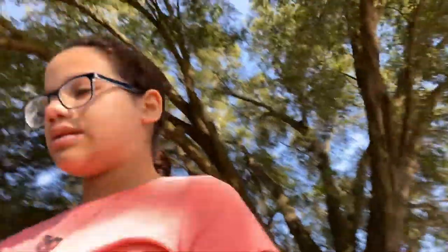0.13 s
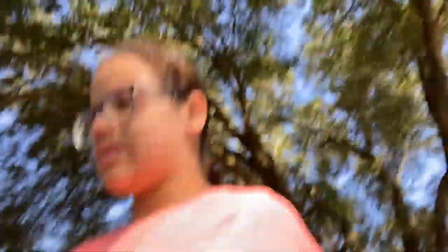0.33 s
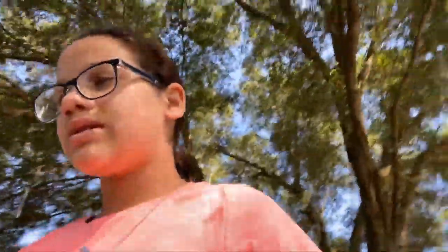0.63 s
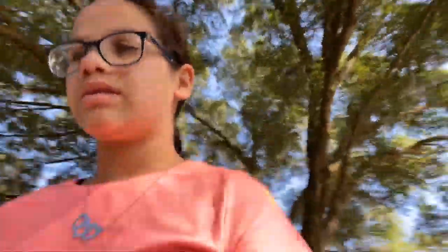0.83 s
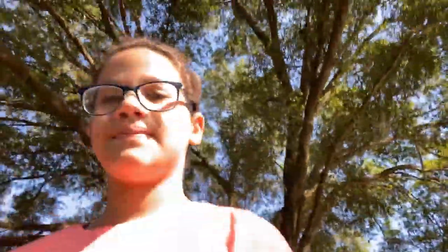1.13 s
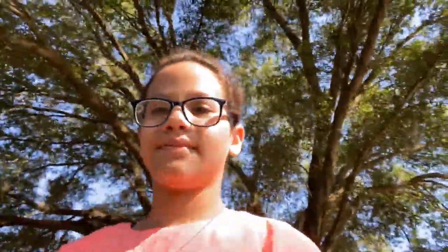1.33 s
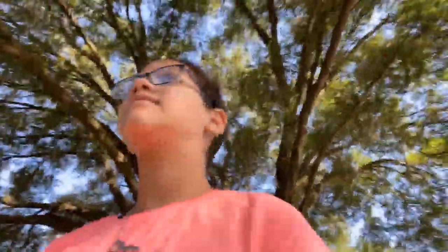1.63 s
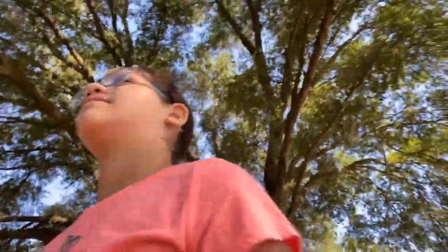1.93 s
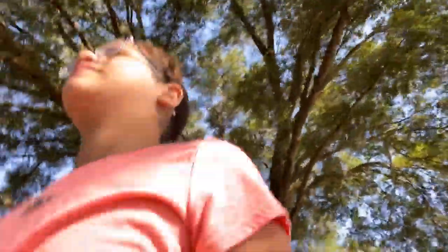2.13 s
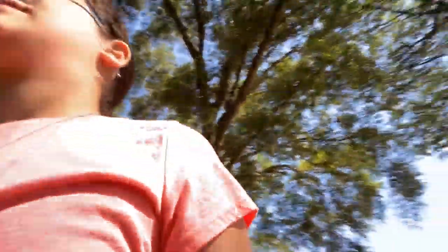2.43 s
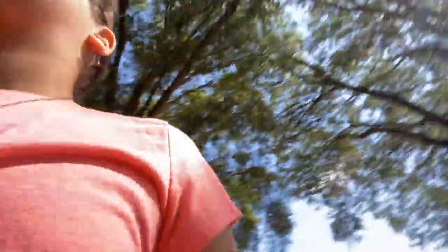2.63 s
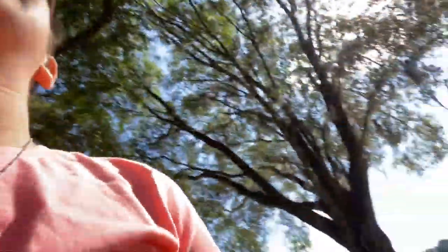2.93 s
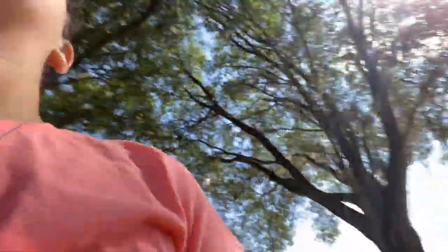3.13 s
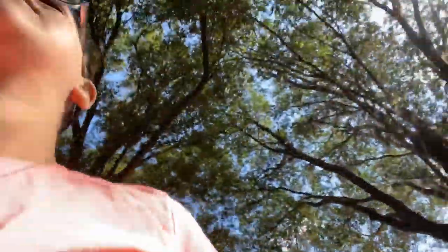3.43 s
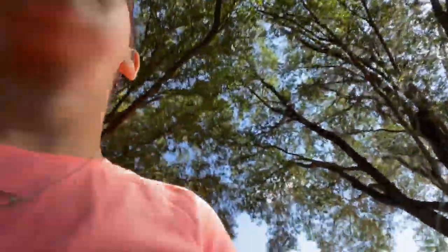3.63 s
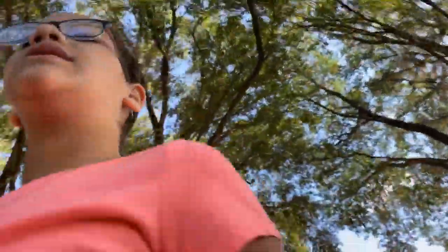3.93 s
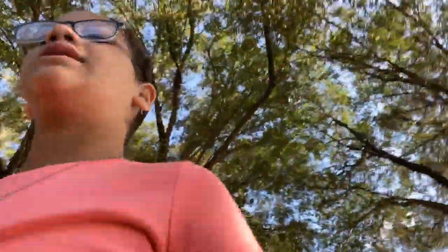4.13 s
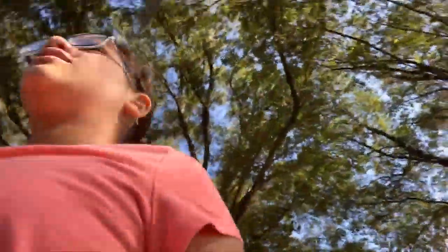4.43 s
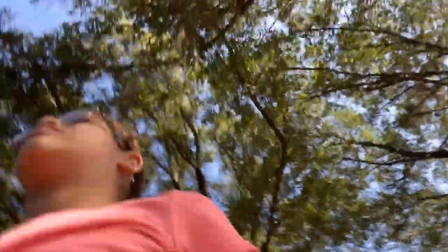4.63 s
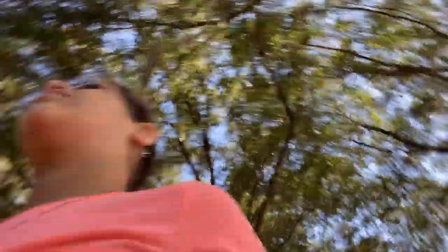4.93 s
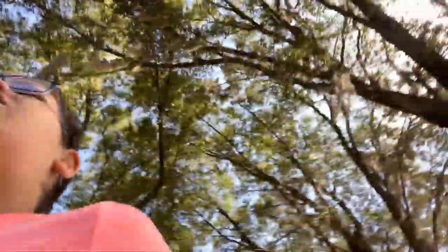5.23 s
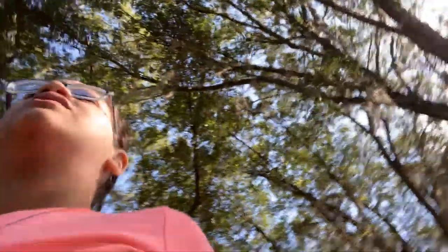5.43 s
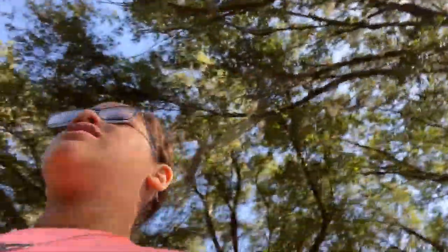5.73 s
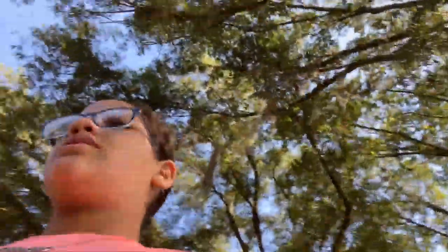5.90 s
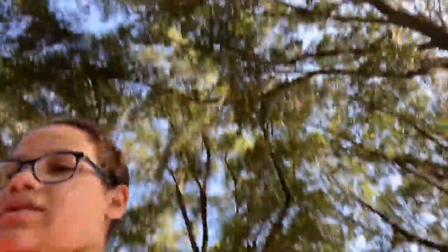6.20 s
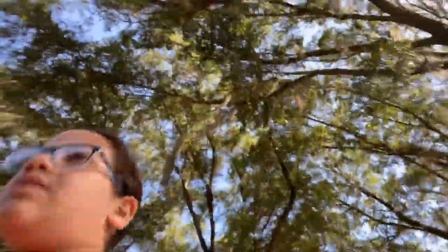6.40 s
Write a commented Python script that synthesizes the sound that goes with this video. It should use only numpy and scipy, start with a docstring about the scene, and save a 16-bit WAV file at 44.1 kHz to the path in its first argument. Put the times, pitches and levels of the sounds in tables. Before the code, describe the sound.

Outdoors under trees, a carried phone's microphone is buffeted by moving air: irregular dull thumps over low rumble and flutter. An early cluster thins to a near-quiet lull around two seconds, leaving leaf hiss and small dry ticks. Thumps return in dense groups before three seconds and continue, with faint scuffs and brief thin chirps. The strongest blast comes shortly after six seconds. Very close, dry sound with no echo.

```python
"""Uneven thumps of moving air buffet a microphone port, over a lumpy rumble and flutter: turbulent noise
whose spectrum stretches with air speed. Someone walks under trees, phone in hand: shoes and cloth scuff
(grainy noise strokes), grit and fingers tick (very short noise bursts), faint chirps and pings sound
(gliding sines). Behind lie leaves (patchy coloured hiss) and far traffic (a swelling noise band)."""
import sys
import numpy as np
from scipy import signal
from scipy.fft import rfft, irfft
from scipy.io import wavfile
from scipy.ndimage import uniform_filter1d, minimum_filter1d

SR = 44100
rng = np.random.default_rng(int(sys.argv[2]) if len(sys.argv) > 2 else 0)


def inscribe(sig):
    """Save sig as 16-bit PCM at rate SR to the path in sys.argv[1].

    A 1-D sig is mono; a 2-D sig holds one channel per row.
    Samples are clipped to [-1, 1] before scaling.
    """
    pcm = np.round(np.clip(np.atleast_2d(sig).T, -1, 1) * 32767)
    wavfile.write(sys.argv[1], SR, pcm.astype(np.int16))


N = 289384  # samples


def amp(db):
    """Amplitude factor of a level in dB."""
    return 10 ** (np.asarray(db) / 20)


def evened(x):
    """Scales x to rms 1."""
    return x / np.sqrt(np.mean(x ** 2) + 1e-20)


def add(mix, start_s, sound):
    """Adds sound to mix from start_s, cropped at both ends of the mix."""
    at = round(start_s * SR)
    part = mix[max(at, 0):][:len(sound) + min(at, 0)]
    part += sound[max(-at, 0):][:len(part)]


def coloured(x, gain):
    """Filters x by gain(Hz)."""
    return irfft(rfft(x) * gain(np.fft.rfftfreq(len(x), 1 / SR)), len(x))


def band(centre_hz, octaves):
    """Bell-shaped gain on the octave axis."""
    return lambda f: np.exp(-2 * (np.log2((f + 1) / centre_hz) / octaves) ** 2)


def wander(corner_hz, count):
    """Slow random drift of rms 1, falling off above corner_hz."""
    return evened(coloured(rng.standard_normal(count), lambda f: 1 / (1 + (f / corner_hz) ** 2)))


PORT_HZ = 57.6  # the microphone port loses the bass below this
EDDY_M = 0.0062
RISE, STEEPNESS = 0.57, 1.262  # spectrum exponents below and above the peak


def eddies(f, speed_m_s):
    """Eddies pass the port about speed / size times a second; smaller ones fade fast."""
    port = 1 / (1 + (PORT_HZ / (f + 1)) ** 4)
    u = f * EDDY_M / np.maximum(speed_m_s, .1)
    return port * u ** RISE * np.exp(-u ** STEEPNESS)


# single buffets of air: (peak time [s], level [dB], nominal air speed [m/s], length scale [ms])
BUFFETS = [(.08, -33, 0.51, 17), (.159, -13.5, 1.47, 4.5), (.176, -22, 0.67, 55), (.217, -23, 0.72, 8.1),
           (.355, -35.5, 2.4, 25), (.374, -23, 1.77, 13), (.412, -22.5, 1.04, 24), (0.434, -25, 2.1, 7.2),
           (.462, -24.5, 1.61, 63), (.562, -24, 0.8, 19), (.61, -24.5, 1.07, 9.3), (.63, -24, 1.53, 8.9),
           (0.674, -27.5, 1, 11), (0.765, -29, 0.63, 4.3), (.85, -35, 1.27, 14), (.886, -25.5, 1.57, 14.6),
           (0.917, -27.5, 1.5, 19), (.922, -23, .81, 46), (1.125, -36, 1.8, 31), (1.179, -36, 1.6, 23),
           (1.249, -38, 0.81, 18), (1.312, -21.5, 2.13, 15.5), (1.335, -21.5, 1.43, 28),
           (1.445, -29, 0.26, 60), (2.223, -30, .6, 30), (2.447, -33.5, 0.41, 41), (2.503, -32.5, 0.93, 16),
           (2.557, -32.5, 1.17, 15.5), (2.758, -35, 0.17, 17), (2.827, -18, 1.58, 6.9),
           (2.843, -14.5, 0.41, 13.3), (2.851, -18.5, 1.66, 7.7), (2.969, -21, 1.45, 17),
           (2.984, -15.5, 1.95, 7.4), (2.993, -15, 2.37, 5.5), (3.005, -19, 2.05, 6), (3.009, -19, .38, 27),
           (3.027, -13.5, 1.99, 6.6), (3.035, -20, 1.4, 14), (3.138, -22.5, 1.3, 12), (3.157, -14, 1.9, 16),
           (3.167, -18.5, 2.94, 2.5), (3.269, -20.5, 1.05, 28), (3.323, -18.5, 1.9, 13.4),
           (3.325, -14, 0.72, 15.5), (3.504, -27.5, 0.5, 15), (3.564, -36, 0.26, 23),
           (3.64, -27.5, 0.44, 86), (3.74, -27.5, 1.1, 12), (3.78, -26.5, 0.85, 28), (3.844, -20.5, .8, 65),
           (3.877, -20, 1.9, 6.1), (3.92, -27, 2.1, 9.8), (3.922, -17, 0.4, 17), (3.963, -13.5, 2.16, 8.1),
           (3.972, -12, 0.42, 15), (3.994, -18.5, 1.36, 6.4), (4.023, -23, 1.17, 6),
           (4.036, -18.5, 0.46, 41), (4.144, -25, 0.48, 12), (4.211, -18.5, 0.41, 11),
           (4.28, -26.5, 0.87, 47), (4.41, -25, 1.37, 7.2), (4.44, -28, 1.47, 14), (4.467, -27, 0.77, 34),
           (4.605, -18, 1.76, 10.3), (4.639, -21.5, 2.34, 9.4), (4.65, -24.5, 1.9, 58),
           (4.677, -17, 1.26, 8.8), (4.722, -18, 1.74, 14), (4.751, -26, 1.4, 18),
           (4.802, -21.5, 1.74, 7.8), (4.879, -28, 1.14, 16), (4.919, -25, 2.14, 38),
           (4.927, -17.5, 0.47, 22), (4.976, -33, 1.6, 21), (4.995, -24.5, 1.74, 14),
           (5.196, -30, 0.45, 17), (5.254, -30, 0.93, 20), (5.39, -19.5, 0.94, 18.5),
           (5.466, -23.5, 1.43, 20), (5.483, -18.5, 1.25, 12.6), (5.544, -19, 1.5, 6.2),
           (5.629, -22.5, 1.6, 8.5), (5.641, -14.5, 0.59, 30), (5.645, -16.5, 2.17, 9.5),
           (5.684, -22, 1.74, 8.5), (5.756, -24, 1.83, 14), (5.781, -26, 2.18, 22), (5.805, -19, 0.8, 18),
           (5.842, -23.5, 1.5, 5), (5.86, -19, 0.62, 18), (6.016, -28, 1.28, 10.6),
           (6.053, -21.5, 0.97, 3.5), (6.088, -19.5, 0.86, 12.6), (6.143, -24.5, 1.7, 4),
           (6.168, -10.5, 2.23, 10.7), (6.185, -4, 3.6, 7.4), (6.21, -11, 2.43, 11), (6.218, -9, 2.5, 9.7),
           (6.233, -10, 2.1, 10), (6.257, -13, 1.65, 26), (6.269, -15, 2.6, 10.6), (6.324, -25, 1.5, 11),
           (6.356, -24, 1.4, 28), (6.389, -23, 1.4, 5.2), (6.525, -14.5, 1.68, 5.1), (6.531, -17, 0.34, 17)]
RISE_SHARE = .52  # part of the length scale given to the swelling side


def buffets():
    """Each buffet is a short swell of turbulence, brightest at its top."""
    count, half = 8192, 4096
    out = np.zeros(N)
    ms = (np.arange(count) - half) / SR * 1000
    taper = np.hanning(count)
    noises = rng.standard_normal((len(BUFFETS), count))
    for (peak_s, db, speed_m_s, length_ms), noise in zip(BUFFETS, noises):
        side_ms = length_ms * np.where(ms < 0, RISE_SHARE, 1 - RISE_SHARE)
        swell = taper * np.exp(-.6 * abs(ms / side_ms) ** 1.024)
        # air cannot turn sharper than this
        swell = uniform_filter1d(uniform_filter1d(swell, size=60), size=60)
        fast = coloured(noise, lambda f: eddies(f, 1.028 * speed_m_s))
        slow = coloured(noise, lambda f: eddies(f, 0.79 * speed_m_s))
        puff = swell * (swell * evened(fast) + (1 - swell) * evened(slow))
        same_energy = np.linalg.norm(swell) / np.linalg.norm(puff)
        add(out, peak_s - half / SR, amp(db) * puff * same_energy)
    return out


# changing draught over the port: (time [s], rumble level [dB], flutter level [dB])
DRAUGHT = [(0.0, -46, -46.5), (0.14, -56, -56), (0.36, -38, -50.5), (0.51, -33, -35.5),
           (0.91, -39.5, -62.5), (1.3, -29.5, -41), (1.51, -47, -54), (1.66, -50, -58),
           (2.47, -51.5, -53.5), (2.61, -43, -64.5), (2.83, -41, -43), (3.0, -34, -39), (3.16, -28.5, -39),
           (3.42, -36, -47), (3.69, -36, -45), (3.85, -28.5, -31), (3.95, -28, -34), (4.24, -35, -49.5),
           (4.46, -32.5, -47.5), (4.8, -29, -36.5), (5.01, -37.5, -44), (5.26, -34.5, -46),
           (5.61, -34.5, -37), (5.83, -32, -39), (6.1, -34.5, -42), (6.25, -30, -34), (6.39, -30.5, -41),
           (6.56, -32, -42.5)]


def draught():
    """Slow air rumbles; the flutter at the port edge is brighter, its colour nearly constant."""
    s, rumble_db, flutter_db = np.transpose(DRAUGHT)
    rumble_m_s = np.full(len(s), .45)
    flutter_m_s = 1.6264 + 0.0032 * (flutter_db + 33.0)
    rumble = flow(rumble_m_s, rumble_db, s, lump_hz=26.2)
    flutter = flow(flutter_m_s, flutter_db, s, lump_hz=60.)
    return rumble + flutter


LUMPY_DB = 7  # bound of the unevenness, before its rms is set to 1


def flow(speed_m_s, level_db, s, lump_hz):
    """Lumpy turbulent noise whose spectrum stretches with the air speed."""
    hz, t, z = signal.stft(rng.standard_normal(N), SR, nperseg=2048)
    shape = eddies(hz[:, None], np.interp(t, s, speed_m_s))
    shape = shape / np.linalg.norm(shape, axis=0)
    noise = signal.istft(z * shape, SR, nperseg=2048)[1][:N]
    lumps = evened(amp(LUMPY_DB * np.tanh(wander(lump_hz, N))))
    power = abs(uniform_filter1d(noise ** 2, size=2600)) + 1e-20
    noise = noise / power ** 0.34  # the flow never bunches for long
    return evened(noise) * lumps * amp(np.interp(np.arange(N) / SR, s, level_db))


# shoes and cloth scuffing: (start [s], length [s], level [dB], centre [Hz], width [octaves])
SCUFFS = [(0.838, .048, -57.5, 2840, 1.1), (1.11, .066, -62, 4550, .35), (1.12, .15, -58.5, 2180, 1.5),
          (1.608, 0.036, -55.5, 2860, 0.83), (1.85, .05, -74, 15000, .3), (2.02, .054, -66, 5000, .4),
          (2.456, 0.036, -55.5, 2140, 0.62), (2.94, 0.06, -58, 3500, 1.6), (2.942, .04, -67, 13500, .5),
          (3.05, .1, -68, 12900, .66), (3.569, .034, -56, 1940, 1.2), (3.79, 0.048, -54, 5800, 0.86),
          (3.831, 0.052, -58, 1890, 0.7), (4.228, 0.22, -64, 2350, .37), (4.597, 0.091, -59, 3420, 1.9),
          (4.765, 0.15, -59.5, 1670, 0.25), (4.781, 0.1, -62, 2700, 0.76), (5.293, .07, -63, 2150, 0.39),
          (5.714, 0.089, -59, 1960, 1), (5.89, .16, -64.5, 2240, .7), (6.14, .14, -77, 12700, 0.39),
          (6.323, 0.14, -58, 2420, 1.6)]
GRAIN_DB = 3  # rms unevenness


def scuffs():
    """Grainy rubbing noise under a short stroke."""
    out = np.zeros(N)
    noises = rng.standard_normal((len(SCUFFS), 2, 16384))
    for (s, length_s, db, hz, octaves), noise in zip(SCUFFS, noises):
        grains = amp(GRAIN_DB * evened(uniform_filter1d(noise[1], 90)))
        rub = coloured(noise[0] * grains, band(hz, octaves))[:round(length_s * SR)]
        stroke = signal.windows.tukey(len(rub), .6)
        add(out, s, amp(db) * evened(rub) * stroke)
    return out


# grit and fingers: (start [s], body peak [dB], centre [Hz], width [octaves], treble snap peak [dB])
TICKS = [(.956, -48, 4200, 0.45, -75), (1.028, -61, 6000, .4, -57), (1.306, -36, 4200, 0.79, -75),
         (1.368, -43, 4970, 1.1, -61), (1.847, -36, 3500, 1.6, -60), (2.02, -43, 3270, 0.84, -72),
         (1.772, -50, 3500, 1.1, -72), (2.355, -49, 5000, 0.83, -61), (2.55, -42, 3140, 1.3, -64),
         (2.675, -52, 6140, .34, -72), (2.93, -42, 3670, 0.77, -69), (2.975, -42, 2800, 1.2, -63),
         (3.485, -62, 9100, .4, -58), (3.553, -48, 4200, .4, -58), (3.572, -35, 3300, 1.3, -51),
         (3.581, -48, 5500, 1.3, -64), (4.582, -55, 4230, 0.37, -59), (5.435, -40, 3700, 1.3, -58),
         (5.519, -42.5, 3400, 0.87, -56)]
TICK_S = 0.00099  # time the envelope takes to peak, and its decay constant


def ticks():
    """A few milliseconds of noise each: a body band and a thin treble snap."""
    out, t = np.zeros(N), np.arange(512) / SR
    envelope = t * np.exp(-t / TICK_S)
    noises = rng.standard_normal((len(TICKS), 512))
    for (s, body_db, hz, octaves, snap_db), noise in zip(TICKS, noises):
        body, snap = band(hz, octaves), band(13000, .35)
        for peak_db, colour in (body_db, body), (snap_db, snap):
            tick = coloured(noise, colour) * envelope
            add(out, s, amp(peak_db) * tick / abs(tick).max())
    return out


# faint chirps and pings:
# (start [s], length [s], starting level [dB], start pitch [Hz], end pitch [Hz], fade over length [dB])
CHIRPS = [(1.312, .065, -58.5, 1950, 1780, 9), (3.42, .06, -64, 3080, 3070, 1.5),
          (3.495, .025, -63, 3070, 3050, 1.5), (3.733, .052, -61, 2720, 2780, 1.5),
          (3.793, .028, -63, 2660, 2650, 1.5), (3.84, .15, -56.5, 2105, 2105, 17),
          (4.822, .07, -60, 2105, 2105, 5), (4.9, .09, -67, 2105, 2105, 1.5)]


def chirps():
    """Narrow whistles, gliding or level, blurred in level by their way through the leaves."""
    out, blur = np.zeros(N), 1 + .35 * wander(90., N)
    for s, length_s, db, from_hz, to_hz, fade_db in CHIRPS:
        u = np.arange(0, 1, 1 / (length_s * SR))
        pitch_hz = from_hz + (to_hz - from_hz) * u
        tone = np.sin(2 * np.pi * np.cumsum(pitch_hz) / SR)
        # 5 ms in, 12 ms out
        edges = np.clip(np.minimum(u / .005, (1 - u) / .012) * length_s, 0, 1)
        add(out, s, np.sqrt(2) * amp(db - fade_db * u) * tone * edges)
    return out * blur


# spectrum of the leaf hiss: (frequency [Hz], relative level per Hz [dB])
HISS = [(50, 11.5), (150, -11), (300, 1.5), (600, 0), (1000, -2), (2000, -6.5), (3300, -12.5), (5000, -8.5),
        (6200, -15.5), (7800, -10), (8700, -15.5), (9900, -10.5), (11000, -25.5), (15500, -28.5)]
HISS_DB, PATCH_DB, SWAY_DB = -54, .9, .25  # mean level, rms patchiness, rms sway
# drone of far traffic: (time [s], level [dB])
TRAFFIC = [(0, -70), (.25, -65), (.55, -54.5), (1.0, -60), (1.4, -60.5), (2.0, -93), (6.56, -68)]


def background():
    """Patchy hiss of leaves, with a noise-band drone of traffic that swells and fades."""
    hz, t, z = signal.stft(rng.standard_normal(N), SR, nperseg=1024)
    patches = uniform_filter1d(rng.standard_normal(z.shape), 14, 0)  # across frequency
    patches = evened(uniform_filter1d(patches, 6, 1))  # across time
    f, db = np.transpose(HISS)
    colour_db = np.interp(np.log(hz + 1), np.log(f), db)[:, None] + PATCH_DB * patches
    hiss = evened(signal.istft(z * amp(colour_db), SR, nperseg=1024)[1][:N])
    s, traffic_db = np.transpose(TRAFFIC)
    drone = evened(coloured(rng.standard_normal(N), band(900, 0.61)))
    drone_db = np.interp(np.arange(N) / SR, s, traffic_db)
    sway_db = SWAY_DB * wander(1.5, N)
    return amp(HISS_DB + sway_db) * hiss + amp(drone_db) * drone


def scene():
    """All sources at the one microphone."""
    return (buffets() + draught() + scuffs() + ticks() + chirps() + background())[None]


EDGE_HZ, LIMIT = 15750, .6  # top of the band, peak limit (full scale = 1)


def record(dry):
    """Bass cut of the microphone, a peak limiter, band limit."""
    cut = signal.sosfilt(signal.butter(4, 50, "high", fs=SR, output="sos"), dry)
    room = np.minimum(LIMIT / (abs(cut) + 1e-9), 1)  # gain that keeps each sample under the limit
    gain = uniform_filter1d(minimum_filter1d(room, size=200), size=200)
    lowpass = signal.firwin(511, EDGE_HZ, window=("kaiser", 9), fs=SR)
    return signal.oaconvolve(cut * gain, lowpass[None], "same")


dry = scene()
out = record(dry)
inscribe(out)
```